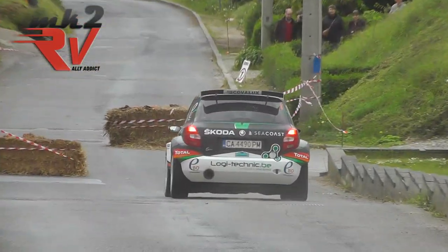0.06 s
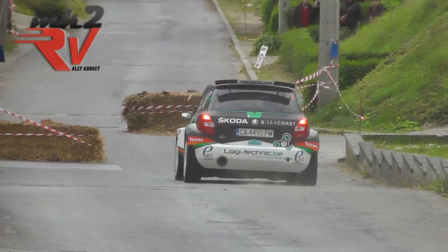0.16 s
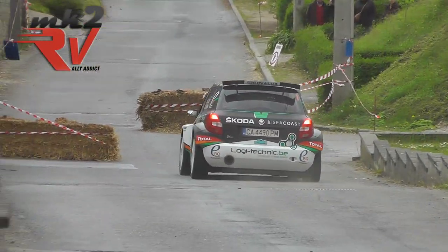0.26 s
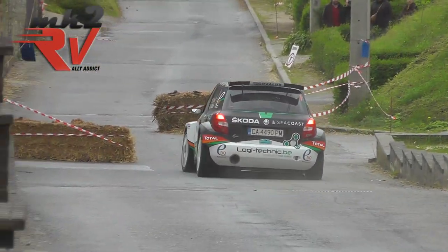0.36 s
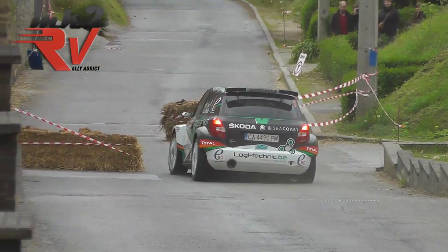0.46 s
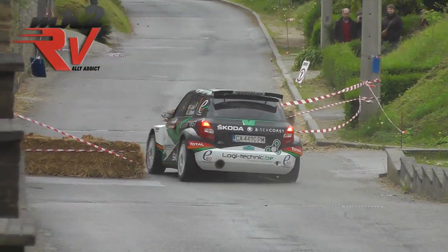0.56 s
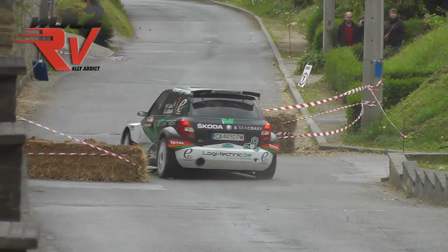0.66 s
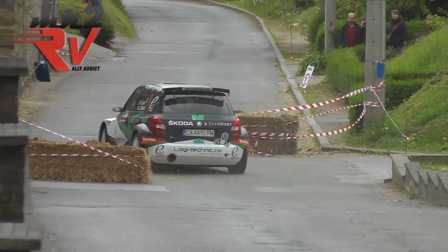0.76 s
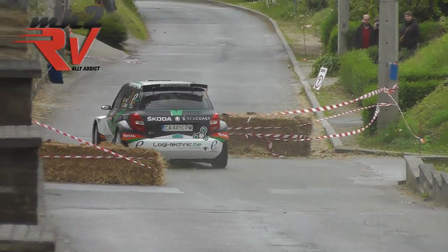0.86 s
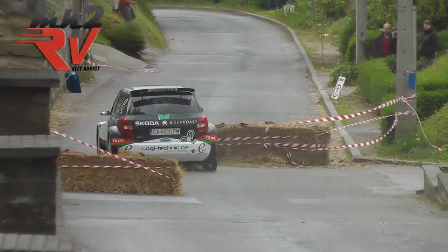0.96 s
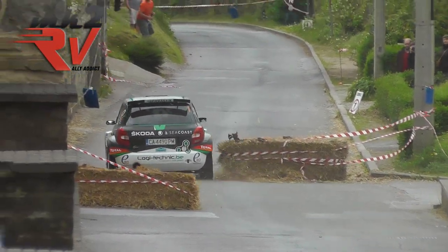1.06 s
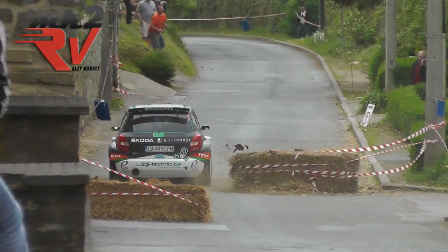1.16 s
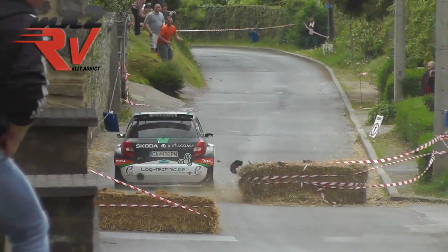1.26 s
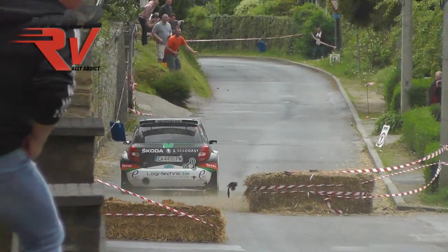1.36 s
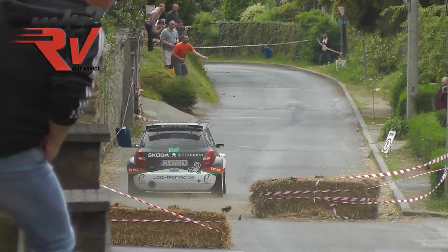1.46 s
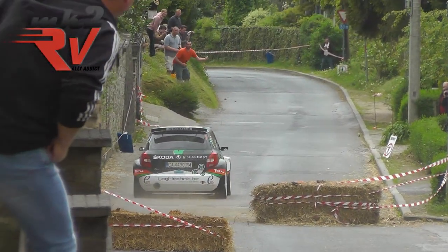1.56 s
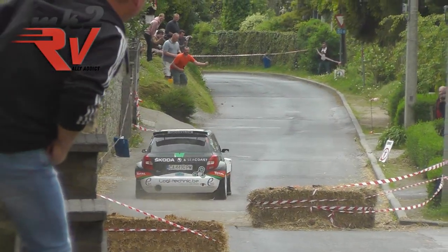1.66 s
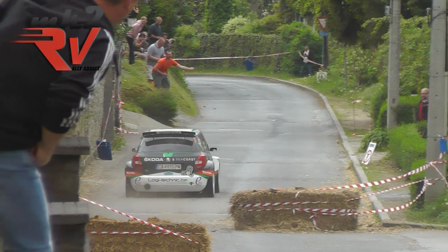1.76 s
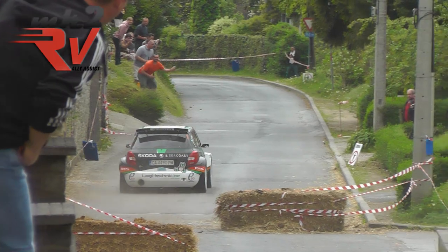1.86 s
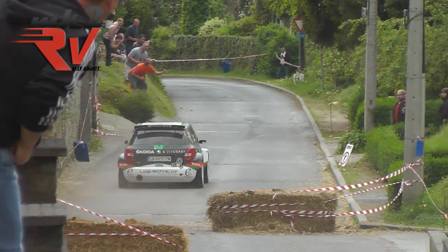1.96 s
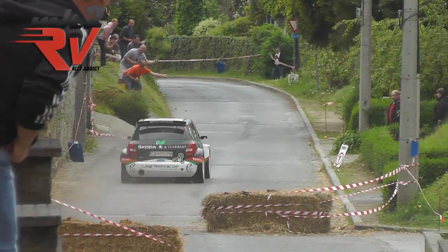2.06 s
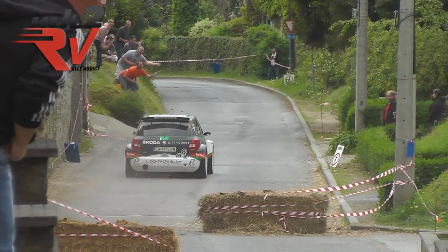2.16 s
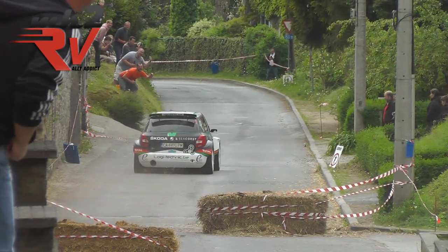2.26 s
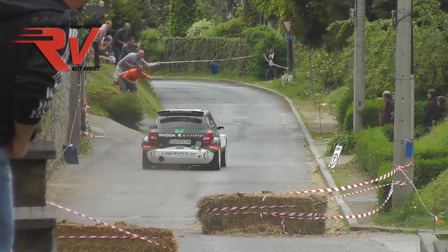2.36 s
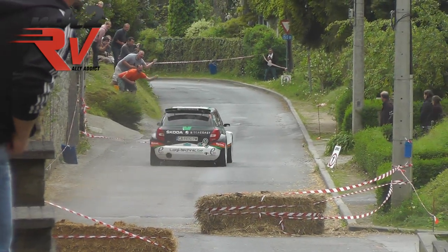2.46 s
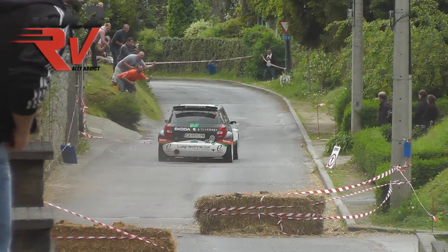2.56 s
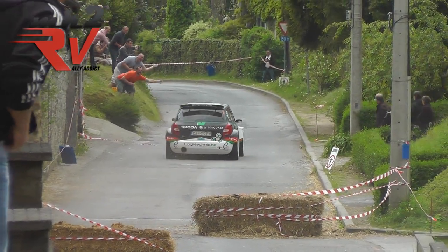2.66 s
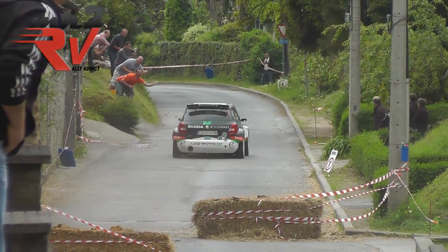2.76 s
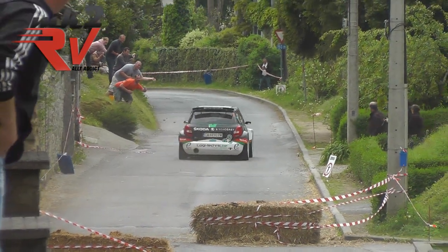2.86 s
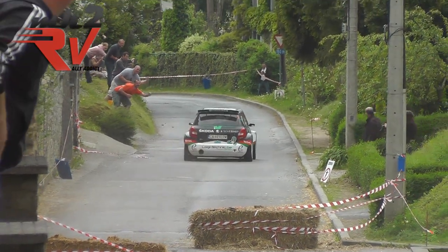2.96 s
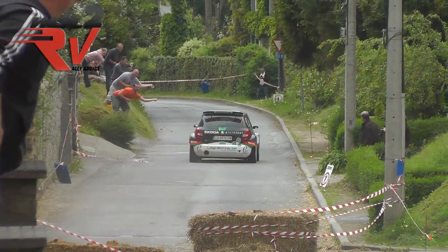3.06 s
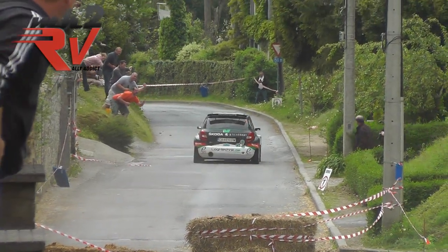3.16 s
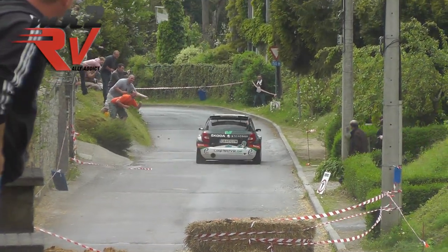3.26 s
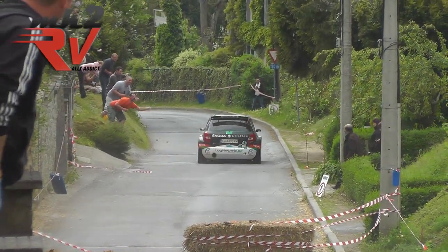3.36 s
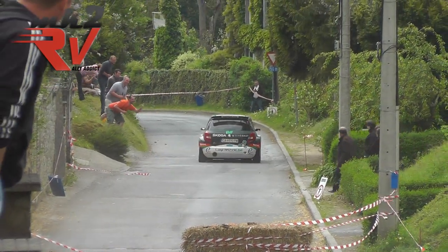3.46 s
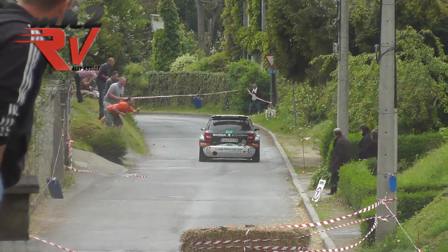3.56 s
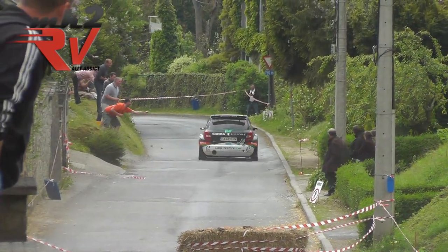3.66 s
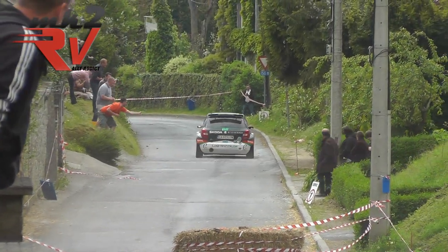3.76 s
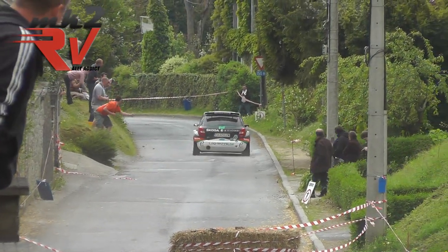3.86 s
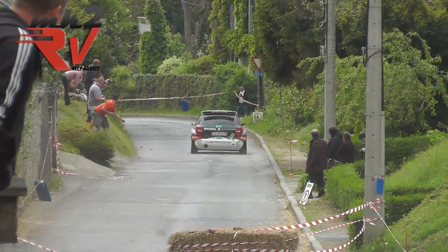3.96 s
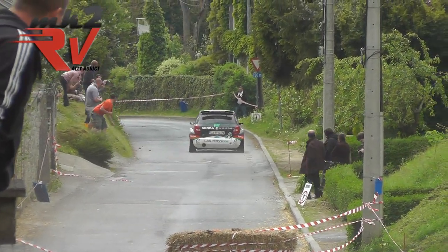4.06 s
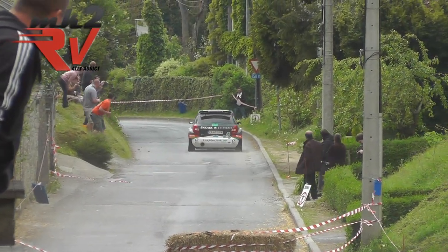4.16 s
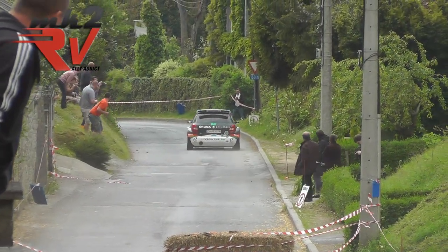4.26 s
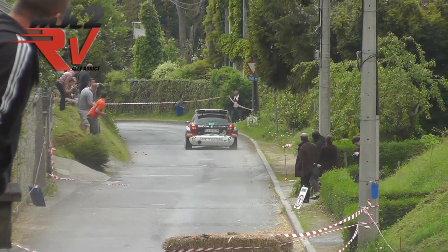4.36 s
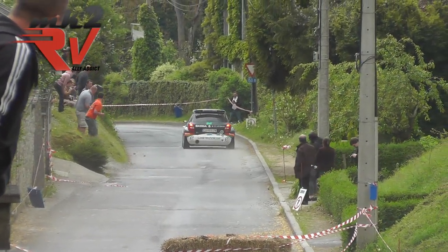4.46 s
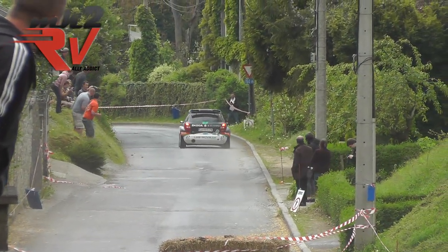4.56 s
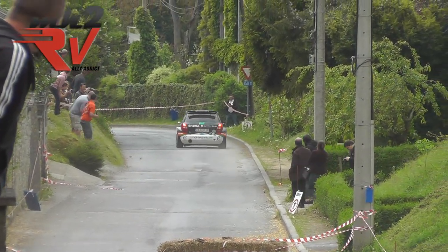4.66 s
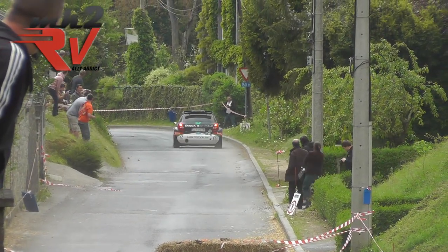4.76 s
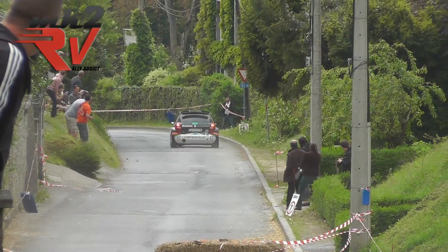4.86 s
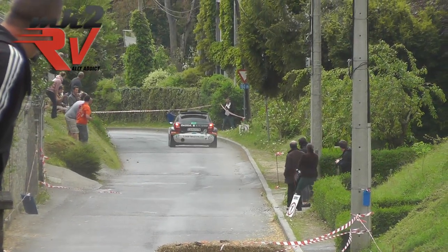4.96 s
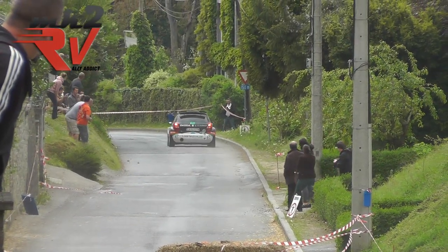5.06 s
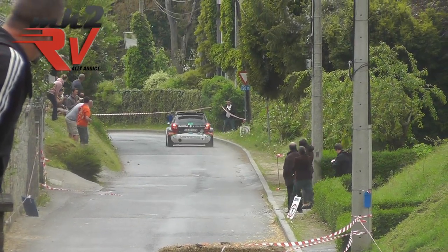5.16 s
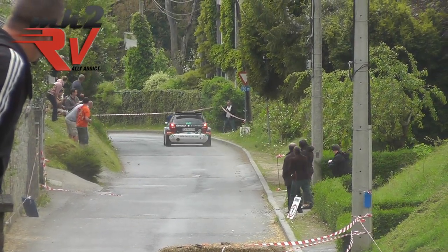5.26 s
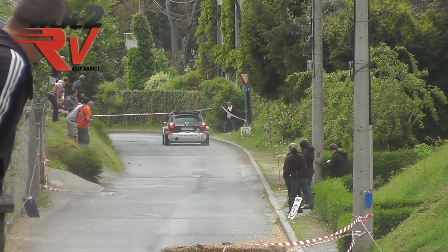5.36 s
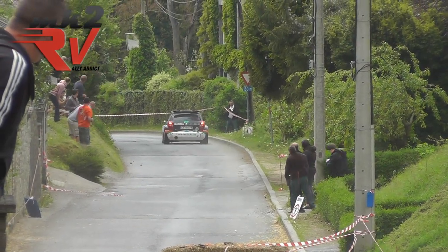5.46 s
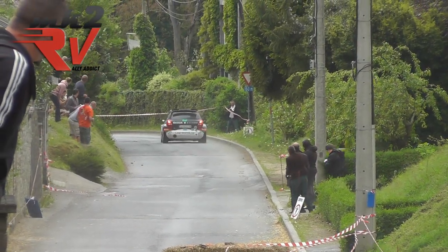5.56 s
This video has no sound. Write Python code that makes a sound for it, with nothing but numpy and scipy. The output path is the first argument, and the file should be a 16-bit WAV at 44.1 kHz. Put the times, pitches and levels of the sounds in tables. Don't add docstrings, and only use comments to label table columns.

```python
import sys
import numpy as np
from scipy import signal
from scipy.fft import rfft, irfft, next_fast_len
from scipy.io import wavfile
from scipy.ndimage import uniform_filter1d

SR = 44100
rng = np.random.default_rng(int(sys.argv[2]) if len(sys.argv) > 2 else 0)


def how_loud(loudness_db):
    steps = np.asarray(loudness_db, float) / 20
    return 10 ** steps


def generate_wav(sig):
    pcm = np.round(np.clip(np.atleast_2d(sig).T, -1, 1) * 32767).astype(np.int16)
    wavfile.write(sys.argv[1], SR, pcm)


N = 247401
TIME_S = np.arange(N) / SR

# frequency in Hz, level in dB per Hz.
WIND_SPECTRUM = [(20, -14.5), (50, 4), (90, -18.5), (300, -44.5)]
# centre in seconds, length in seconds, change in dB.
WIND_GUSTS = [
    (0.016, 0.11, 7.5),
    (0.458, 0.092, 1),
    (0.756, .3, -7.5),
    (1.495, .08, 5.5),
    (2.101, .2, 6),
    (2.7, 0.34, -5),
    (3.355, 0.13, 11),
    (4.0, .3, -7),
    (4.602, .4, -8.5),
    (5.046, 0.086, 4),
]
# frequency in Hz, level in dB per Hz.
CIRCUIT_SPECTRUM = [(300, 9), (9000, -5.5), (16000, -1)]
# start in seconds, peak in dB.
TREBLE_TICKS = [(0.1077, -42.5), (0.2004, -48.5), (0.2967, -52.5), (0.5771, -51), (0.9857, -47.5),
                (1.3853, -50.5), (1.4356, -50.5), (1.7045, -52.5), (1.9385, -55), (1.9934, -62.5),
                (2.1395, -50.5), (2.2987, -52.5), (2.3351, -52), (2.384, -41), (2.5591, -57.5), (2.7092, -49),
                (2.8943, -51), (3.0979, -49.5), (3.1637, -56.5), (3.7514, -57.5), (3.936, -49),
                (4.4418, -50.5)]
# frequency in Hz, level in dB per Hz.
TICK_SPECTRUM = [(5000, -41), (9000, -8), (12000, 1), (16000, -0.5)]

# frequency in Hz, 60 dB decay time in seconds.
LANE_T60 = [(100, 0.81), (800, 0.34), (3000, 0.073), (9000, 0.17)]
# frequency in Hz, level in dB.
LANE_SPECTRUM = [(60, -15.5), (250, -28), (500, -7), (800, -14.5), (1500, -8.5), (3000, -10.5), (4500, -15),
                 (6500, -23.5), (8000, -9.4), (11000, 1.5)]
# frequency in Hz, left minus right in dB.
PORT_TILT_DB = [(60, 1.5), (92, -1.5), (140, -2), (210, -2.2), (330, 0), (500, -1.6), (760, 3), (1160, 3),
                (1770, 0.2), (2710, 0.1), (4000, 1)]
# frequency in Hz, left lead in radians.
PORT_LEAD_RAD = [(0, -0.16), (340, -0.059), (600, -0.73), (1120, -0.6), (1380, -0.44), (1640, -0.72),
                 (2150, -0.371), (2410, -1.2), (3300, 0.44), (4000, 0)]
# time in seconds, left minus right in dB.
PAN_DB = [(0, 0), (.8, -0.1), (1.6, 0.5), (3, 0.5), (3.8, 0.5), (4.3, -1), (4.8, -0.5), (5.61, -0.5)]
# time in seconds, share from near 0 to far 1.
DISTANCE_SHARE = [(0, 0.13), (1.3, 0.075), (2.35, 0.28), (2.45, 0.62), (3.55, 0.56), (3.7, 0.6),
                  (5.61, 0.77)]
# frequency in Hz, change in dB.
FAR_SPECTRUM = [(300, 10), (570, -4), (700, -7.5), (860, 4), (1400, 4), (1680, -1), (1870, 2.5), (2100, 2),
                (2600, -0.5), (6500, -6), (8000, -12.5), (9500, -25.5), (15000, -20)]

# start in seconds, peak in dB, ring in Hz, decay in seconds.
BODY_KNOCKS = [
    (0.782, -21.5, 2565, 0.0016),
    (0.787, -30, 2460, 0.001),
    (0.893, -15, 1280, 0.0014),
    (0.784, -24, 1620, 0.0032),
    (0.888, -15, 2294, 0.001),
    (0.892, -19.5, 2868, 0.00093),
    (3.758, -27.5, 1891, 0.0059),
    (3.826, -26.5, 1760, 0.0076),
    (4.144, -27, 1750, 0.0099),
    (4.836, -18.5, 1840, 0.004),
]
# start in seconds, then thud, bark and crack peaks in dB.
PIPE_BANGS = [(0.106, -17.5, -29.5, -42), (0.2, -26.5, -20, -38), (0.278, -17.5, -9, -51),
              (0.298, -11.5, -14, -47.5), (0.313, -6.5, -23, -56.5), (0.364, -12.5, -28.5, -36),
              (0.887, -31.5, -13.5, -48.5), (0.951, -10, -14.5, -42.5), (1.119, -1, -16, -43.5),
              (2.33, -8, -22.5, -54), (2.37, -3, -23.5, -46), (2.379, -19, -5, -47),
              (2.383, -3, -17.5, -26.5), (4.205, -40.5, -18.5, -61.5), (4.224, -24.5, -15.5, -41.5),
              (4.263, -9.5, -11.5, -42.5), (4.325, -16, -19, -49), (4.373, -16, -9, -43.5),
              (4.395, -16, -10, -39), (4.428, -6, -8, -41.5), (4.439, -15.5, -1.5, -34.5),
              (4.4427, -18.5, -5, -27), (4.488, -25, -11, -46), (5.428, -37.5, -16, -40.5)]
# frequency in Hz, level in dB per Hz.
CRACK_SPECTRUM = [(300, -6.5), (1000, 8.5), (3000, 0.5), (6000, -13), (15000, -39.5)]
# frequency in Hz, level in dB per Hz.
RASP_SPECTRUM = [(800, -79.5), (1250, -19.5), (1420, -5.5), (1620, -8), (1860, 2), (2050, -3), (2220, -1),
                 (2500, -12), (2800, -2.5), (3300, -31), (5500, -94.5)]
# centre in seconds, length in seconds, level in dB.
RASP_BURSTS = [
    (0.243, 0.13, -32.5),
    (0.985, .1, -41),
    (3.803, 0.094, -36),
    (4.143, 0.15, -39),
    (4.698, 0.11, -42),
    (4.832, 0.12, -33),
    (5.024, 0.066, -33.5),
    (5.089, 0.075, -33.5),
    (5.242, .08, -36.5),
    (5.432, 0.074, -40),
]

# time in seconds, firing rate in Hz.
FIRING_HZ = [(0, 207.1), (.18, 196), (.24, 219.1), (.3, 203.2), (.41, 237.7), (.78, 215.7), (.95, 207.9),
             (1.17, 200), (1.32, 230), (1.72, 239.4), (2.13, 252), (2.36, 259.4), (2.47, 215.3),
             (4.43, 256.8), (4.53, 214.4), (5.2, 218.5), (5.36, 204.4), (5.61, 181.9)]
# time in seconds, first order in dB, bite of the higher orders in dB.
THROTTLE_DB = [(0, -13, -2.5), (.2, -15.5, -9.5), (.33, -21, -14.5), (.45, -8.5, -5), (.78, -17.5, -2.5),
               (.95, -12.5, -3.5), (.99, -7, -3), (2.2, -6.5, 4.5), (2.37, -18, -9), (2.5, -10, -4.5),
               (3.3, -8.5, 1), (3.94, -14, 1), (4.43, -11, 1), (4.53, -16, -8.5), (4.87, -8.5, -4.5),
               (5.25, -10.5, -3), (5.3, -19.5, -13), (5.61, -24.5, -15)]
# centre and length in seconds, swing in Hz, swell in dB.
SPEED_SURGES = [(0.098, 0.048, 3, 1.5), (0.176, 0.058, -4, 4.5), (0.224, 0.033, 8, 12),
                (0.994, 0.032, 3, 6.5), (1.057, .03, 10, 3), (1.032, 0.088, 34, -3),
                (1.264, 0.063, 34, 1.5), (0.876, .05, 10, 0.5), (1.188, .02, 12, 0.5),
                (5.281, .03, 8.5, 0.5), (1.433, 0.096, 3, .8), (1.839, 0.045, 6, -5),
                (2.47, 0.039, -9.5, 1.5), (4.535, 0.064, -5, -3), (5.425, 0.036, 21, 7),
                (5.476, 0.077, -1, 5)]
# start in seconds, swing in Hz, wobble rate in Hz, decay in seconds.
DRIVELINE_SHUDDERS = [
    (1.359, 5.5, 8, .12),
    (1.565, 8.4, 9.16, .5),
    (2.498, 6, 8.5, 0.44),
    (4.572, 3.98, 11.6, 0.2),
]
# start in seconds, then orders 2, 3, 4 and 5 in dB.
PULL_FACING = [
    (0, -29, -32, -37, -28.5),
    (0.969, -31, -27.5, -38, -38),
    (2.44, -27, -20, -18, -31),
    (3.5, -33, -23, -27, -43),
    (4.5, -26, -22.5, -35, -26),
]
# frequency in Hz, lift of a passing order in dB.
PIPE_LIFT_DB = [(380, 4.5), (450, 1.5), (520, -4.5), (620, 4), (700, -5.5), (770, 6.5), (900, -2.5),
                (1100, -3.5)]
# start in seconds, length in seconds, lump lift in dB, half order lift in dB.
BURN_STUTTERS = [(0, 0.067, 13, 17), (0.085, 0.12, 4.5, 6), (0.236, 0.044, 10, 13.5),
                 (0.274, 0.052, 15, 20), (0.328, .16, 7, 22.5), (0.486, .25, -1.5, 18.5),
                 (0.76, 0.094, 2.5, 7), (0.892, 0.11, 7, 15), (1.001, .1, -1, 16), (1.102, 0.17, 8.5, 12.5),
                 (2.325, 0.029, 15.5, 6.5), (2.368, 0.039, 16.5, 4), (2.391, 0.18, 8.5, 3),
                 (4.199, 0.029, 15.5, -6.5), (4.249, 0.025, 4, 0), (4.31, 0.025, 13, 4), (4.37, 0.03, 9, 1),
                 (4.41, 0.071, 12, 8), (4.481, .02, 6, 4), (5.258, 0.047, 11, 2), (5.363, 0.046, 10.5, 1),
                 (5.485, 0.052, 8.5, -9)]
# time in seconds, level in dB.
FLOW_DB = [(0, 0.5), (.2, -3), (.38, -1), (.55, 0), (1.06, 1), (1.14, -2), (1.25, -2), (1.56, -1.5),
           (2.33, 1.5), (2.45, -7.5), (2.7, 1), (3.4, -1.5), (4.2, 4), (4.52, -5.5), (4.8, -3), (5.24, 0),
           (5.32, -4), (5.61, -9.5)]
# centre in seconds, length in seconds, lift in dB.
GAS_BLASTS = [(0.241, 0.051, 7), (0.344, 0.035, 9), (0.894, 0.015, 2.5), (2.756, 0.16, -2),
              (3.615, 0.066, -3), (3.943, 0.41, -1), (4.433, 0.024, 5), (4.908, 0.92, 1.5),
              (4.797, 0.085, 0.5), (1.304, .06, 1), (2.174, 0.09, -2.5), (5.465, 0.13, 3.5)]
# centre in seconds, length in seconds, hiss lift in dB.
HISS_SWINGS = [(0.214, .15, 4), (0.395, .08, 1.5), (0.559, 0.23, -3), (0.769, .16, 2.5), (1.04, 0.11, 2.5),
               (1.158, 0.041, 2), (1.269, 0.096, 4.5), (1.48, 0.11, 0.5), (1.702, .14, 0.5),
               (1.872, .06, -1), (2.006, 0.089, 1.5), (2.9, .1, 0), (3.4, 0.23, 3), (4.8, 0.3, 2.5)]

# frequency in Hz, level in dB per Hz.
LUMP_SPECTRUM = [(40, -36.5), (75, -18), (110, -6.5), (160, 0), (260, 3), (350, 3.5), (450, -7.5),
                 (560, -17), (800, -39), (1600, -91.5)]
# frequency in Hz, level in dB per Hz.
ROAR_SPECTRUM = [(120, -61), (250, -31), (420, 5), (560, 2.5), (720, 11), (950, 11), (1150, 0.5),
                 (1400, 1.5), (1850, -2), (2400, -6.5), (3300, -10.5), (4300, -23.5), (6000, -63.5)]
# frequency in Hz, level in dB per Hz.
HISS_SPECTRUM = [(2000, -17), (3500, 4.5), (4400, 0.5), (5600, -1.5), (7000, -0.2), (8500, -10.5),
                 (10500, -23), (12500, -31), (15700, -30)]
# time in seconds, share in the roar.
UNEVEN_SHARE = [(0, 0.42), (1.2, 0.36), (2.4, 0.3), (3.4, 0.32), (4.4, 0.39), (4.8, 0.33), (5.61, 0.44)]

ORDER_MULTIPLES = [1, 1.5, 2, 3, 4, 5, 3.5]
ORDER_LAG_TURNS = [0, .3, .1, .2, .3, .4, .2]
# multiple of the firing rate, level against the first order in dB.
UPPER_ORDERS = [(6, -38), (7, -41.5), (8, -43)]
# time in seconds, level in dB.
SPREAD_DB = [(0, -34.5), (2.5, -43), (3.4, -29.5), (4.2, -30), (4.5, -44.5), (5.4, -44)]
# centre in seconds, length in seconds, change in dB
SPARK_CUTS = [(0.145, 0.013, -6.5), (0.211, 0.01, -9.5), (0.26, 0.025, -7), (0.237, 0.067, -4.5),
              (0.37, 0.015, -3), (0.888, 0.013, -14.5), (0.971, .018, -4.5), (1.053, 0.014, -1.5),
              (1.116, 0.0048, -8.5), (1.144, 0.019, -17), (1.164, 0.016, 1), (1.176, 0.0092, -16.5),
              (1.204, 0.008, -10), (1.272, 0.025, -5), (1.403, 0.014, -2.5), (1.812, 0.032, -4.5),
              (2.337, 0.018, -10), (2.338, 0.0096, 2), (2.367, 0.0016, -16.5), (2.421, 0.017, 2),
              (2.45, 0.0044, -3.5), (2.472, 0.0087, -12.5), (2.496, .008, -7), (4.217, 0.0064, 4),
              (4.27, 0.01, -16.5), (4.322, 0.01, -13), (4.38, 0.023, -10), (4.425, 0.0091, -6),
              (4.45, 0.011, -16.5), (5.285, 0.012, -8), (5.365, 0.021, -7.5), (5.402, .012, -5),
              (5.467, 0.014, -2.5), (5.521, 0.014, -18.5), (5.581, 0.011, -6.5)]
# centre in seconds, length in seconds, change in dB.
ORDER_BEATS = [
    [(.19, 0.089, 13), (1.17, 0.032, 12), (1.55, 0.23, 3.5), (1.76, 0.079, 5), (.28, .1, -18),
     (1.05, 0.066, 1.5), (3.8, 0.07, 5.5), (5.18, .1, 2), (2.17, 0.31, -5), (2.57, 0.15, -2.5),
     (2.76, 0.04, 9.5), (2.87, 0.032, 6), (2.94, 0.02, -25), (3.08, .1, 0), (3.6, 0.14, 3.5),
     (4.15, 0.24, -9.5), (4.69, 0.33, 5), (4.87, .08, -6.5), (5.09, 0.037, -16.5), (5.285, 0.034, 16.5),
     (5.415, 0.0068, 11.5), (5.46, 0.039, 8.5), (5.55, 0.084, 10)],
    [(0.01, 0.045, 12.5), (.235, 0.062, 19), (.5, 0.15, -10), (.88, 0.086, 13), (1.042, 0.072, 14),
     (1.1, 0.047, 0), (.995, 0.025, -2), (1.27, 0.023, 9), (1.58, .12, -3.5), (1.72, 0.018, 7.5),
     (1.88, 0.057, 7.5), (2.34, 0.075, 17.5), (2.44, 0.061, 2), (4.7, 0.12, -4), (4.98, 0.044, -3.5),
     (3.0, 0.026, -17.5), (3.3, 0.23, -0.5), (4.25, 0.17, -1.5), (4.88, 0.04, -11), (5.12, 0.23, 7),
     (5.35, 0.066, -3), (5.445, 0.023, 5.5)],
    [(.21, 0.25, 12), (.5, 0.18, -14), (1.35, 0.091, 10.5), (1.6, 0.13, 12.5), (1.9, 0.13, 12),
     (2.47, 0.072, 7), (2.9, 0.063, 1), (4.87, 0.048, 1.5), (5.12, .12, 4), (.98, 0.019, 10),
     (1.04, 0.029, 12), (2.62, 0.14, 4), (3.15, 0.058, 3.5), (4.08, 0.18, 3.5), (4.25, 0.079, -10),
     (3.85, .4, 5.5), (4.75, 0.21, 10.5), (4.96, 0.12, -20), (5.42, 0.035, -3)],
    [(.78, 0.12, 2.5), (1.05, 0.094, 12), (2.74, 0.39, 9), (3.3, 0.16, 0.5), (4.7, 0.17, 4.5),
     (5.15, 0.48, 5.5), (3.2, 0.1, -9), (3.45, 0.11, -0.5)],
]
# centre in seconds, length in seconds, change in dB.
UPPER_BEATS = [
    [(1.3, 0.41, -1), (2.95, 0.88, 8.5), (4.05, 0.29, 16), (4.9, 0.37, -0.5)],
    [(2.55, .12, 11), (2.8, 0.27, 12), (3.1, .15, 11.5), (3.33, .15, 10.5), (4.15, 0.079, 14),
     (5.0, 0.48, 5.5)],
    [(3.8, .15, 14), (4.85, 0.45, 17)],
]
# time in seconds, share of flutter and stray.
UNSTEADY_SHARE = [(0, 1.1), (2.5, 1.25), (3.1, 1.25), (3.5, 1.0), (4.4, 1.0), (4.6, .95)]


def evened(x):
    return x / np.sqrt(np.mean(x ** 2) + 1e-20)


def read(points, hz):
    f, value = np.transpose(points)
    return np.interp(np.log(hz + 1), np.log(f + 1), value)


def columns(rows):
    s, *rest = np.transpose(rows)
    return [np.interp(TIME_S, s, c) for c in rest]


def colour(x, points):
    log_gain = np.log(how_loud(read(points, abs(np.fft.fftfreq(8192, 1 / SR)))))
    taps = np.fft.ifft(np.exp(log_gain - 1j * signal.hilbert(log_gain).imag)).real[:4096]
    return signal.oaconvolve(x, taps if x.ndim == 1 else taps[None])[..., :N]


def noise(*shape):
    return rng.standard_normal(shape or N)


def wander(hz):
    f = np.fft.rfftfreq(N, 1 / SR)
    return evened(irfft(rfft(noise()) / (1 + (f / hz) ** 4), N))


def hump(s, length_s):
    return np.exp(-.5 * (2 * (TIME_S - s) / max(length_s, .002)) ** 2)


def humps(rows, column=2):
    return sum(row[column] * hump(row[0], row[1]) for row in rows)


def plateau(s, length_s, edge_s):
    return np.clip(np.minimum(TIME_S - s, s + length_s - TIME_S) / edge_s + .5, 0, 1)


def add(mix, s, sound):
    part = mix[round(s * SR):][:len(sound)]
    part += sound[:len(part)]


def air():
    lull_db = -5 * (TIME_S > 3.1)
    wind_db = -54.5 + 2.9 * wander(5) + lull_db + humps(WIND_GUSTS)
    wind = how_loud(wind_db) * evened(colour(noise(2, N), WIND_SPECTRUM))
    opening_db = 10 * (np.arange(N) / N) ** 5.5
    circuit = evened(colour(noise(2, N) + 1.2 * noise(), CIRCUIT_SPECTRUM))
    return wind + how_loud(-70 + opening_db) * circuit


def ticks():
    out, t = np.zeros(N), np.arange(400) / SR
    grains = evened(colour(noise(len(TREBLE_TICKS), len(t)), TICK_SPECTRUM)[:, :len(t)])
    for (s, db), grain in zip(TREBLE_TICKS, grains * np.exp(-t / .0012)):
        add(out, s, how_loud(db - 2.0) * grain)
    return out


def lane(x):
    wet, turn = 0, 2 * np.pi * 1.3 * TIME_S
    slots = np.arange(200, SR // 2 - 20, 20)
    for share in (np.cos(turn), np.sin(turn)):
        taps = np.zeros((2, SR // 2))
        at = slots + rng.integers(0, 20, (2, len(slots)))
        np.put_along_axis(taps, at, rng.choice([-1., 1.], at.shape), 1)
        hz, t, z = signal.stft(taps, SR, nperseg=256)
        decay_db = -60 * t / read(LANE_T60, hz)[:, None]
        tail = signal.istft(z * how_loud(decay_db), SR, nperseg=256)[1]
        tail = tail / np.linalg.norm(tail[0])
        wet = wet + signal.fftconvolve((share * x)[None], tail, axes=1)[:, :N]
    return colour(wet, LANE_SPECTRUM)


def ports(x):
    size = next_fast_len(N + SR // 10)
    hz, side = np.fft.rfftfreq(size, 1 / SR), np.array([[.5], [-.5]])
    tilt = how_loud(side * read(PORT_TILT_DB, hz)) * np.exp(1j * side * read(PORT_LEAD_RAD, hz))
    return irfft(rfft(x, size) * tilt, size)[:, :N] * how_loud(side * columns(PAN_DB)[0])


def knocks():
    out, t = np.zeros(N), np.arange(3000) / SR
    for s, db, hz, decay_s in BODY_KNOCKS:
        ring = np.sin(2 * np.pi * hz * t) * t / decay_s * np.exp(-t / decay_s)
        add(out, s, how_loud(db + 10.0) * ring)
    return out


def bangs():
    out, t = np.zeros(N), np.arange(3000) / SR
    thud = np.sin(2 * np.pi * 125 * t) * np.exp(-t / 0.0098) * (1 - np.exp(-t / 0.0044))
    bark = np.sin(2 * np.pi * 340 * t) * np.exp(-t / 0.01)
    bark = bark + 5.6 * np.sin(2 * np.pi * 850 * t) * np.exp(-t / 0.0012)
    bark = bark * (1 - np.exp(-t / 0.0023))
    cracks = evened(colour(noise(len(PIPE_BANGS), len(t)), CRACK_SPECTRUM)[:, :len(t)])
    cracks = cracks * np.exp(-t / 0.0027) * (1 - np.exp(-t / .0006))
    for (s, thud_db, bark_db, crack_db), crack in zip(PIPE_BANGS, cracks):
        add(out, s, how_loud(thud_db + 2.0) * thud + how_loud(bark_db) * bark + how_loud(crack_db + 8.5) * crack)
    return out


def rasp(turns):
    puffs = (.3 + np.exp(-(turns % 1) / 0.23)) * how_loud(2.7 * wander(40)) * noise()
    level = sum(how_loud(db) * hump(s, length_s) for s, length_s, db in RASP_BURSTS)
    return level * evened(colour(puffs, RASP_SPECTRUM))


def cylinders(turns):
    strength = np.array([wander(4) for _ in range(4)])
    strength = strength - strength.mean(axis=0)
    which = np.floor(turns).astype(int) % 4
    return evened(np.diff(np.floor(turns), prepend=0) * strength[which, np.arange(N)])


def far_share():
    return np.clip(columns(DISTANCE_SHARE)[0], 0, 1)


def roughness(turns, rough_db, gusts_db, gate):
    lump_db, roar_db, hiss_db = rough_db
    far = far_share()
    fired = evened(np.diff(np.floor(turns), prepend=0) * noise())
    puffs = (1 + gate * np.cos(2 * np.pi * turns)) * how_loud(gusts_db * wander(24))
    lump = evened(colour(0.81 * fired + noise(), LUMP_SPECTRUM))
    crank = np.cos(np.pi * turns + 0.64 * wander(27))
    uneven = columns(UNEVEN_SHARE)[0] * cylinders(turns)
    roar = evened(colour(0.041 * fired + puffs * noise() + uneven, ROAR_SPECTRUM))
    hiss = evened(colour(puffs * noise(), HISS_SPECTRUM))
    gas = how_loud(roar_db) * roar + how_loud(hiss_db) * hiss
    gas = (1 - far) * gas + far * colour(gas, FAR_SPECTRUM)
    return how_loud(lump_db) * (lump + (1.1 - 1.26 * far) * crank) + gas


def spark_db():
    return humps(SPARK_CUTS)


def shudder(s, swing_hz, rate_hz, decay_s):
    u = np.maximum(TIME_S - s, 0)
    return swing_hz * np.sin(2 * np.pi * rate_hz * u) * np.exp(-u / decay_s)


def engine():
    hz = columns(FIRING_HZ)[0] + humps(SPEED_SURGES)
    hz = hz + sum(shudder(*row) for row in DRIVELINE_SHUDDERS)
    swell_db = humps(SPEED_SURGES, column=3)
    first_db, bite_db = columns(THROTTLE_DB)

    pull = np.searchsorted([row[0] for row in PULL_FACING[1:]], TIME_S)
    facing_db = np.array(PULL_FACING, float)[pull, 1:].T
    facing_db = uniform_filter1d(facing_db, round(0.29 * SR), axis=1)
    higher_db = [db + bite_db + swell_db + read(PIPE_LIFT_DB, k * hz) + humps(beats)
                 for k, db, beats in zip(ORDER_MULTIPLES[2:], facing_db, ORDER_BEATS)]

    held = np.array([plateau(s, length_s, .02) for s, length_s, *_ in BURN_STUTTERS])
    lump_up_db, half_up_db = (np.sum(held * np.array(BURN_STUTTERS)[:, [k]], axis=0) for k in (2, 3))
    levels_db = [first_db + swell_db, -38 + half_up_db] + higher_db + columns(SPREAD_DB)

    flow_db = columns(FLOW_DB)[0] + 0.14 * swell_db
    lump_db = -29.5 - 2.5 * far_share() + lump_up_db
    roar_db = -24 + 0.79 * flow_db + humps(GAS_BLASTS)
    hiss_db = -42.5 + 0.75 * flow_db + humps(HISS_SWINGS)
    return hz, levels_db, (lump_db, roar_db, hiss_db)


def orders(turns, levels_db, flutter_db, stray_rad):
    out, cut_db = np.zeros(N), spark_db()
    strong = list(zip(ORDER_MULTIPLES, ORDER_LAG_TURNS, levels_db))
    weak = [(k, 0, levels_db[0] + db + humps(beats)) for (k, db), beats in zip(UPPER_ORDERS, UPPER_BEATS)]
    for k, lag_turns, db in strong + weak:
        sway_db = flutter_db * k ** 0.64 * wander(29) + cut_db * k ** 0.42
        phase = 2 * np.pi * (k * turns - lag_turns) + stray_rad * k * wander(33)
        out += np.sqrt(2) * how_loud(db + sway_db) * np.cos(phase)
    return out


def scene():
    hz, levels_db, rough_db = engine()
    turns = np.cumsum(hz) / SR
    share = columns(UNSTEADY_SHARE)[0]
    tone = orders(turns, levels_db, flutter_db=.75 * share, stray_rad=.065 * share)
    rough = how_loud(0.13 * spark_db()) * roughness(turns, rough_db, gusts_db=1.0, gate=0.067)
    car = tone + rough + bangs() + knocks() + rasp(turns)
    bass_cut = signal.butter(3, 72, "highpass", fs=SR, output="sos")
    car = signal.sosfilt(bass_cut, car)
    settle = np.sin(np.pi / 2 * np.minimum(TIME_S / .015, 1)) ** 2
    return ports(car) + how_loud(0.5) * lane(car * settle) + air() + ticks()


def low_pass(x):
    return signal.sosfilt(signal.butter(12, 15760, fs=SR, output="sos"), x)


def record(dry):
    rounded = np.sign(dry) * (.85 + .15 * np.tanh((abs(dry) - .85) / .15))
    soft = np.where(abs(dry) > .85, rounded, dry)
    soft = soft * np.minimum(TIME_S / .002, 1) ** 2
    return low_pass(soft)


dry = scene()
out = record(dry)
generate_wav(out)
```